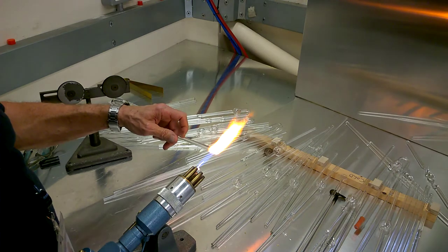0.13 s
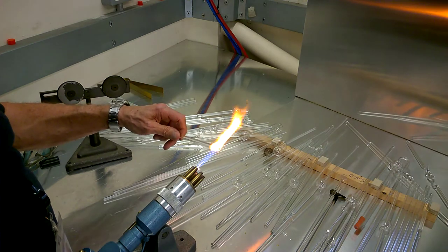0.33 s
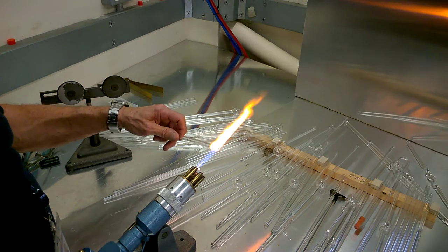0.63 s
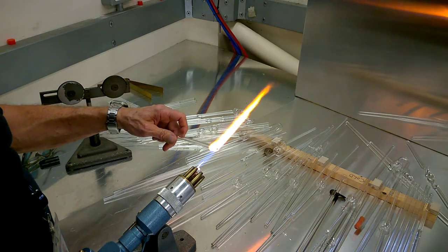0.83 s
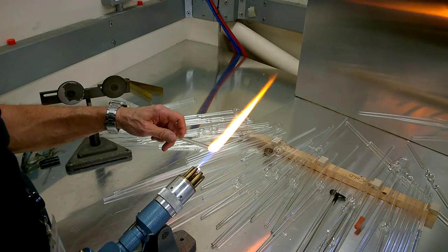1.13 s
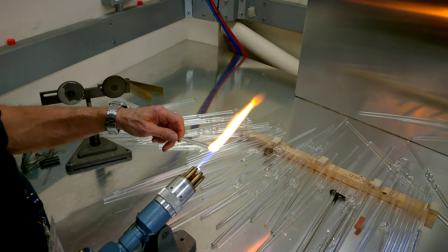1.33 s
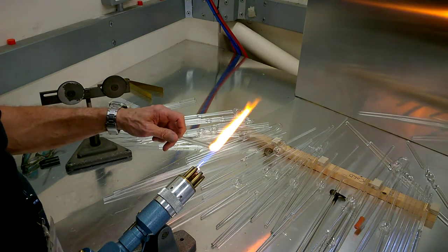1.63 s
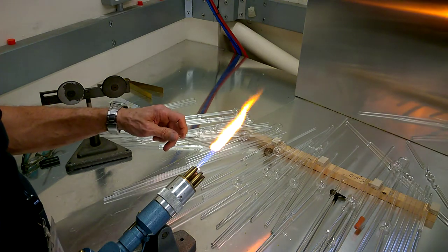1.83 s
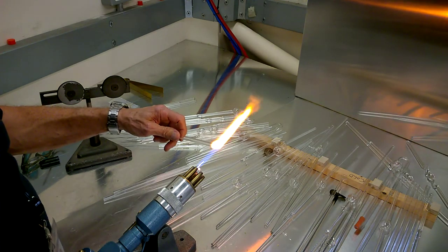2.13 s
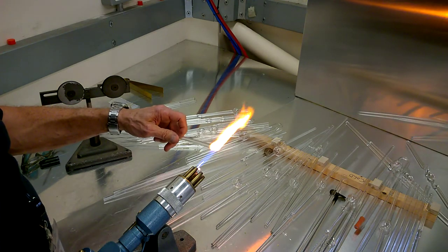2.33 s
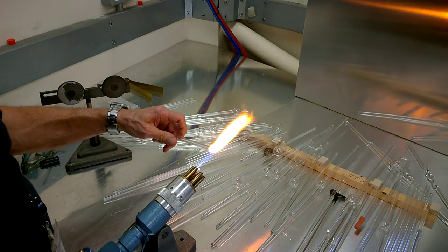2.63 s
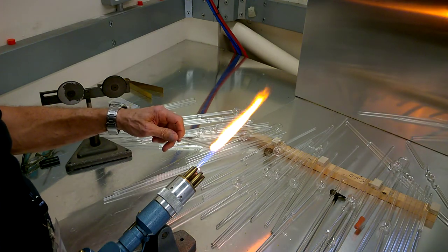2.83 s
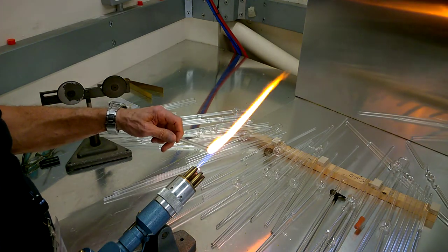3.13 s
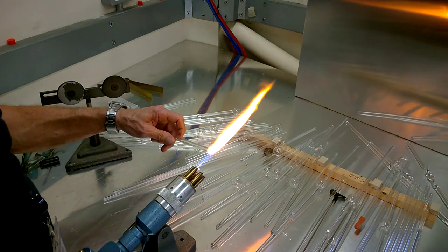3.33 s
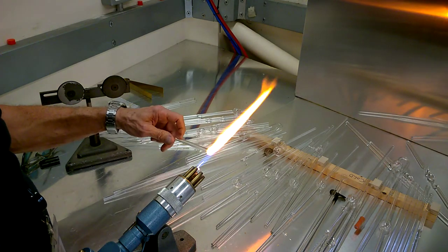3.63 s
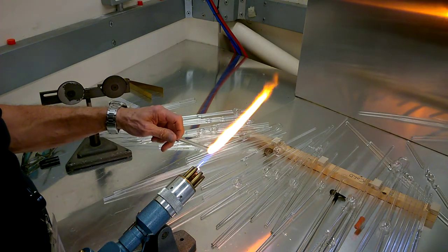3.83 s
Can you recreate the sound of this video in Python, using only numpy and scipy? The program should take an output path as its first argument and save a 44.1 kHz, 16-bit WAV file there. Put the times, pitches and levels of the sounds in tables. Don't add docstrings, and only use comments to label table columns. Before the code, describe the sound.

A gas bench torch burns continuously with a low, bassy, fluttering roar in a workshop; behind it a steady fan hum, thin hiss and very faint high metallic whine. Mono, quiet, with slight microphone hiss.

```python
import sys
import numpy as np
from scipy import signal
from scipy.fft import rfft, irfft, next_fast_len
from scipy.io import wavfile
from scipy.ndimage import uniform_filter1d, map_coordinates

SR = 44100
rng = np.random.default_rng(int(sys.argv[2]) if len(sys.argv) > 2 else 0)


def wav_record(signal):
    frames = np.transpose(np.atleast_2d(signal))
    bounded = np.clip(frames, -1, 1)
    quanta = np.round(bounded * 32767).astype(np.int16)
    wavfile.write(sys.argv[1], SR, quanta)


def invert_db(x):
    u = np.asarray(x, float) / 20
    return 10 ** u


N = 175077
T = np.arange(N) / SR


def unit(x):
    return x / np.sqrt(np.mean(x ** 2) + 1e-20)


def wobble(rate_hz):
    return map_coordinates(rng.standard_normal(400), [T * rate_hz])


def flutter(rate_hz):
    curve = wobble(rate_hz)
    return curve - uniform_filter1d(curve, size=7000)


def noise(gain):
    m = next_fast_len(N + 8192)
    spectrum = rfft(rng.standard_normal(m))
    return irfft(spectrum * gain(np.fft.rfftfreq(m, 1 / SR)), m)[:N]


def shaped(points):
    f, db = np.transpose(points)

    def gain(hz):
        return invert_db(np.interp(np.log(hz + 1), np.log(f + 1), db, -120, -120))

    return noise(gain)


def coloured(points):
    return unit(shaped(points))


def ringing(modes):
    def gain(hz):
        power = 0
        for centre, width, db in modes:
            detuning = 2 * (hz - centre) / width
            power = power + invert_db(2 * db) * SR / (2 * width) / (1 + detuning ** 4)
        return np.sqrt(power)

    return noise(gain)


def patchy(x, patchy_db):
    z = signal.stft(x, nperseg=512)[2]
    field = uniform_filter1d(rng.standard_normal(z.shape), size=5, axis=0)
    field = uniform_filter1d(field, size=6, axis=1)
    return signal.istft(z * invert_db(patchy_db * unit(field)), nperseg=512)[1][:N]


# start t/s, end t/s, f/Hz, rms level/dB
MOAN = (3.3, 3.85, 402.5, -59)


def duct_moan():
    start, end, hz, db = MOAN
    progress = np.clip((T - start) / (end - start), 0, 1)
    swell = np.sin(np.pi * progress ** 0.6) ** 2
    return np.sqrt(2) * invert_db(db) * swell * np.sin(2 * np.pi * hz * T)


# f/Hz, rms level/dB
FAN = [
    (167.6, -50.5),
    (484.5, -69.5),
]


def extractor_fan():
    waver_db, drift_hz = 0.7, 0.22
    hum = np.zeros(N)
    for hz, db in FAN:
        level = np.sqrt(2) * invert_db(db + waver_db * wobble(rate_hz=3.97))
        phase = 2 * np.pi * np.cumsum(hz + drift_hz * wobble(rate_hz=3)) / SR
        hum += level * np.sin(phase)
    return hum


HEAD_HZ = (2560, 3015, 3970, 4005, 4066, 4040, 4150, 4189, 4280, 4460, 4540, 4695, 4771, 4860)
HEAD = [(56, -88), (24.9, -90.5), (22, -85), (21, -84), (27, -82), (300, -81), (40, -91), (20, -87),
        (15, -98), (50, -93), (40, -91), (20, -87.5), (26.4, -84.5), (80, -87)]
TUBE_HZ = (4750, 5000, 5483, 5569, 5597, 5651, 5763, 6080, 6530, 6610, 6768, 7780, 7896, 7960)
TUBE = [(350, -84.5), (80, -93), (15, -93), (24, -83), (14, -86), (30, -90.5), (40, -90.5), (130, -95),
        (30, -99), (15, -101), (170, -89), (50, -101), (35, -98.5), (25, -91.5)]
TIP_HZ = (8091, 8654, 8733, 8795, 8902, 8976, 9088, 9170, 9264, 9326, 9500, 10200, 10286, 10830)
TIP = [(20, -104), (30, -100), (25, -96), (35, -94), (30, -95), (30, -99), (20, -103), (50, -100),
       (20, -102), (30, -94.5), (70, -94), (120, -100), (25, -101), (130, -101)]


def metal_whistles():
    flutter_db, flutter_hz = 0.25, 16
    total = np.zeros(N)
    for part in ((HEAD_HZ, HEAD), (TUBE_HZ, TUBE), (TIP_HZ, TIP)):
        total += ringing(np.column_stack(part)) * invert_db(flutter_db * flutter(flutter_hz))
    return total


# f/Hz, width/Hz, rms level/dB
ROOM = [(62.6, 5.4, -54), (86.5, 14.4, -50.5), (121.4, 10.3, -55.5), (156.1, 6.9, -56), (222.1, 11, -61),
        (249.2, 13.5, -61.5), (288.6, 6.6, -68), (305.6, 4.7, -68), (346, 6.5, -71.5), (400.7, 11, -68.5),
        (194.3, 27, -62), (328.5, 10, -70), (643, 25, -76), (813.4, 12, -80.5)]


def room_modes():
    return ringing(ROOM)


# f/Hz, spectral level/dB per Hz
JET = [(900, -18), (2000, -4.5), (3400, 1), (4600, 0), (6100, -1), (7100, -15), (9000, -22)]


def jet_hiss():
    return invert_db(-73) * unit(patchy(coloured(JET), patchy_db=0.54))


# f/Hz, spectral level/dB per Hz
ROAR = [(26, -24), (45, -3), (105, -12.5), (170, -9), (215, -16.5), (490, -22), (867, -30), (2500, -47)]
# t/s, rise in level/dB
GUSTS = [
    (.64, 3),
    (.95, 2.5),
    (2.61, 2.5),
    (3.19, 3),
]


def flame_roar():
    gust_s, flicker_db, flicker_hz = 0.017, 0.5, 18
    gusts_db = sum(up * np.exp(-((T - at) / gust_s) ** 2) for at, up in GUSTS)
    flicker = invert_db(flicker_db * flutter(flicker_hz) + gusts_db)
    return invert_db(-49.5) * unit(patchy(coloured(ROAR), patchy_db=0.85)) * flicker


# t/s, level/dB
SURGE = [(0.0, -45.5), (0.6, -46), (0.65, -38.5), (0.72, -63), (0.87, -41.5), (1.45, -44.5), (1.51, -37.5),
         (1.61, -47.5), (1.94, -38.5), (1.99, -51), (2.06, -40.5), (2.27, -48), (2.35, -40.5),
         (2.85, -44.5), (2.9, -51), (2.95, -37), (3.15, -50), (3.94, -41)]
# f/Hz, width/Hz, level/dB
RUMBLE = [
    (18.83, 6.2, 2),
    (32.3, 6.7, 5.5),
    (41.3, 4, -2),
]


def flame_rumble():
    evening = 0.64
    low = unit(ringing(RUMBLE))
    beating = np.sqrt(np.abs(uniform_filter1d(low ** 2, size=3000))) + 0.2
    even = unit(low / beating ** evening)
    t, db = np.transpose(SURGE)
    surge_db = uniform_filter1d(np.interp(T, t, db), size=1800)
    return invert_db(surge_db + 3.0) * even


def scene():
    background = duct_moan() + extractor_fan() + metal_whistles()
    torch = room_modes() + jet_hiss() + flame_roar() + flame_rumble()
    return (background + torch)[None]


def low_pass(x):
    return signal.sosfilt(signal.butter(12, 15725, fs=SR, output="sos"), x)


def record(dry):
    spectrum = [(1500, 2), (7000, -4), (12000, -0.5), (17000, -3)]  # f/Hz, level/dB per Hz
    hiss = invert_db(-78.5) * coloured(spectrum)
    return low_pass(dry + hiss)


dry = scene()
out = record(dry)
wav_record(out)
```